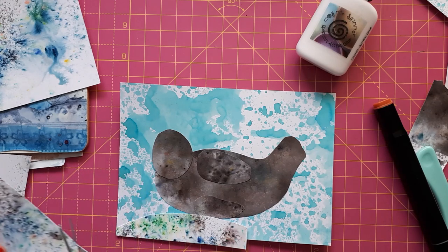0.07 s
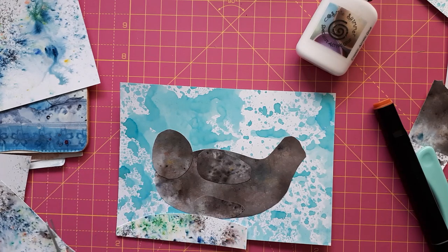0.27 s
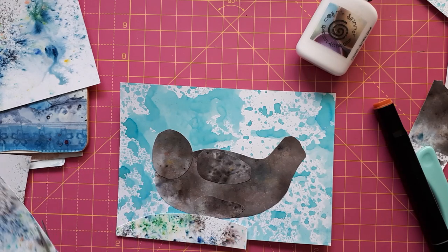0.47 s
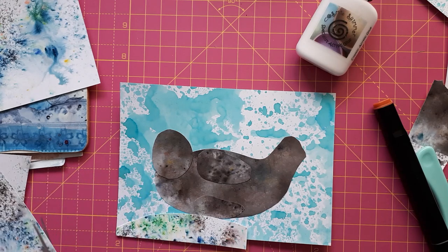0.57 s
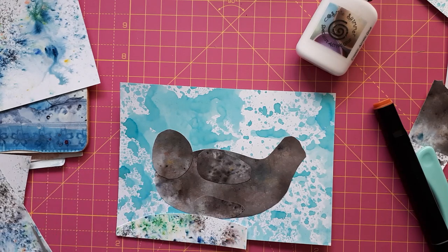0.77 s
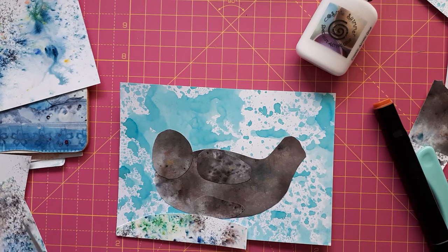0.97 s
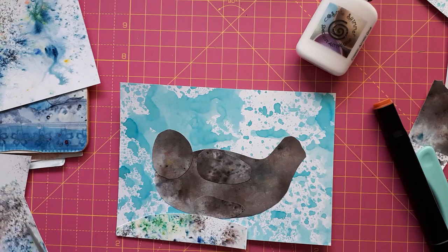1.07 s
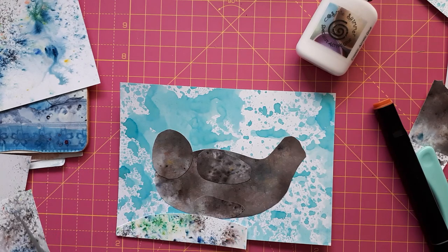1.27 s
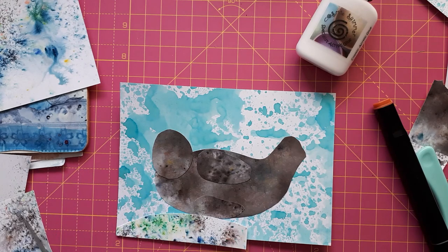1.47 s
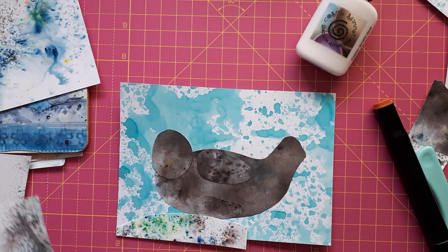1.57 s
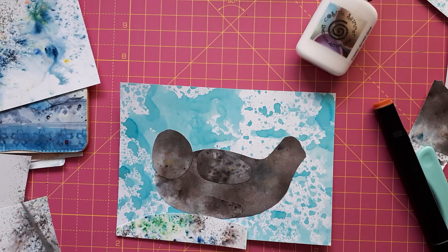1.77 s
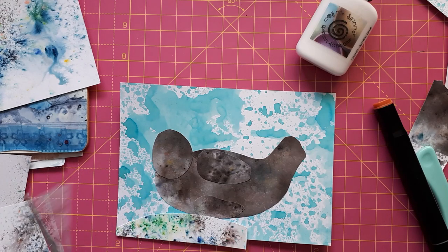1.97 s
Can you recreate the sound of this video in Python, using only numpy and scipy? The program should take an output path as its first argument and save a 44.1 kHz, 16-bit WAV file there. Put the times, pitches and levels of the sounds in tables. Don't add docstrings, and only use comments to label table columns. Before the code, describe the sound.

Close and a little to the right, scissors crunch through stiff paper in five brisk strokes, with thin metal rubbing between them, then the tips click shut, loudest of all, in a small, dry, nearly silent room.

```python
import sys
import numpy as np
from scipy import signal
from scipy.fft import rfft, irfft
from scipy.io import wavfile
from scipy.ndimage import uniform_filter1d, map_coordinates

SR = 44100
rng = np.random.default_rng(int(sys.argv[2]) if len(sys.argv) > 2 else 0)


def put_to_file(sound):
    columns = np.atleast_2d(sound).T
    safe = np.clip(columns, -1, 1)
    whole_steps = np.round(safe * 32767)
    wavfile.write(sys.argv[1], SR, whole_steps.astype(np.int16))


def volts_from_db(level):
    exponent = np.asarray(level, float) / 20
    return 10 ** exponent


N = 89390

# (start [s], end [s], level [dB])
CLOSINGS = [
    (0.225, 0.354, -57),
    (0.642, 0.728, -51),
    (1.007, 1.105, -57.5),
    (1.364, 1.448, -56),
    (1.809, 1.915, -54),
]
# (frequency [Hz], level [dB])
SHEET_COLOUR = [(200, -32), (400, -15), (700, -9), (1100, -3), (1900, -2.5), (3700, -7.5), (4500, -9),
                (7700, -15), (16000, -17.5)]
# (frequency [Hz], level [dB])
RUB_COLOUR = [(400, -24.5), (900, -1), (2100, -1.5), (3900, 2.5), (5000, -23), (7800, -3.5), (9300, -14.5),
              (12000, -4.5), (16000, -19)]


def unit(x):
    return x / np.sqrt(np.mean(x ** 2))


def colour(x, table):
    hz, db = np.array(table).T
    bins_hz = np.linspace(1, SR / 2, 1025)
    log_gain = np.interp(np.log(bins_hz), np.log(np.maximum(hz, 1)), db) * np.log(10) / 20
    cepstrum = irfft(log_gain)
    cepstrum[1:1024] *= 2
    cepstrum[1025:] = 0
    return signal.fftconvolve(x, irfft(np.exp(rfft(cepstrum))))[:len(x)]


def split(x, order, hz):
    return [signal.sosfilt(signal.butter(order, hz, kind, fs=SR, output="sos"), x) for kind in ("low", "high")]


def cut_lows(x, order, hz):
    return signal.sosfilt(signal.butter(order, hz, "high", fs=SR, output="sos"), x)


def ring(x, hz, width):
    return signal.lfilter(*signal.iirpeak(hz, hz / width, fs=SR), x)


def cracks(size, spread_db):
    return rng.standard_normal(size) * volts_from_db(spread_db * rng.exponential(size=size))


def walk(rate):
    k = int(SR / rate)
    return unit(uniform_filter1d(uniform_filter1d(rng.standard_normal(N), k), k))


def burst(length_ms, spread_db, release_ms, attack_ms=0.56):
    sag_ms = 12
    ms = np.arange(3000) / SR * 1000
    swell = 1 - np.exp(-ms / attack_ms)
    decay = np.exp(-np.maximum(ms - length_ms, 0) / release_ms - ms / sag_ms)
    return swell * decay * cracks(len(ms), spread_db)


def add(out, x, s, peak_db):
    i = int(s * SR)
    out[i:i + len(x)] += (x * volts_from_db(peak_db) / np.abs(x).max())[:N - i]


def slips():
    # (time [s], peak [dB], sheet pitch [Hz], treble [dB], length
    # [ms])
    jerks = [(0.144, -57.5, 2200, 11, 2.1), (0.159, -60, 1720, 5.5, 9.4),
             (0.176, -57.5, 940, 10, 1.3), (0.309, -41, 934, -5, 2.5), (0.315, -36, 1070, -5, 1),
             (0.3237, -34, 1310, -4, 0.74), (0.34, -31.5, 1030, -5, 2.8), (0.395, -56, 930, -15, 4.4),
             (0.676, -26, 2320, -3.5, 3.7), (0.734, -22.5, 1790, -28, 1.27),
             (0.772, -46.5, 1250, -3.5, 0.62), (1.07, -32.5, 1680, -23, 1.5),
             (1.119, -49, 876, 5, 0.72), (1.3709, -35.5, 1740, -19, 0.73),
             (1.3776, -28, 1930, -19, 0.28), (1.386, -24, 1980, -5.5, 2),
             (1.441, -23.5, 1840, -1.5, 1.55), (1.796, -56, 1030, 3, 1.4), (1.804, -49, 1020, 4, 1.5),
             (1.812, -40, 1460, -1.5, 3.9), (1.817, -42.5, 990, 3.5, 1.65),
             (1.893, -32, 1004, 6.5, 1.25), (1.909, -46, 2500, 3.5, 2.2), (1.93, -47.5, 3000, 5, 2.7),
             (0.099, -69, 2020, 8, 1.9), (0.244, -74, 864, -26, 2.1), (0.262, -42.5, 805, 3.5, 8.4),
                  (0.3451, -21.5, 1650, -8.5, 3.9), (0.366, -27, 970, -6.5, 1.7),
                  (1.028, -33, 2470, -6, 2.2), (1.054, -24, 982, -7.5, 4.8), (1.089, -21, 2240, -6, 4.1),
                  (1.096, -35, 2360, -27, 2.96), (1.389, -24, 1320, -13, 1.94),
                  (1.4161, -25.5, 1180, -8, 3.1), (1.831, -31, 960, -1, 2.1), (1.867, -29, 947, 0.5, 4),
             (0.123, -62, 910, 9, 6.3), (0.226, -51, 874, 10.5, 6.8), (0.293, -36, 1610, -2, 11),
                 (0.648, -41.5, 1890, -8, 12), (0.665, -31.5, 1590, -3, 10.5),
                 (0.689, -23.5, 2250, -6.5, 6.8), (0.7139, -21, 1830, -9, 4.5),
                 (1.009, -40, 1940, -22, 3.9), (1.015, -26, 1900, -9, 5.7), (1.398, -24, 1340, -11.5, 9.5),
                 (1.844, -28.5, 1560, -4.5, 6.4),
             (1.038, -28.5, 2340, -7, 10.5), (1.016, -29.5, 1195, -33, 8.5),
                   (1.028, -33, 1080, -22, 4), (1.097, -32.5, 800, -20, 3.2), (1.382, -34, 1400, -7, 3),
                   (0.283, -47.5, 930, 7, 3.4), (0.357, -41.5, 1650, -10, 7.2), (0.73, -39, 2600, -11, 8),
                   (3.6, -44, 2900, 2, 10), (1.853, -49, 2000, 4, 7.1), (0.27, -49, 812, 3.5, 1.5),
                   (1.406, -30.5, 1230, -5, 5.3), (1.055, -24, 3800, -18, 2.4),
                   (0.7195, -23.5, 1850, -19, 1.7), (0.716, -27, 1036, -27, 5.4),
                   (0.68, -34.5, 1010, 0.5, 2.5), (0.694, -36, 1050, -23, 6), (1.126, -48, 890, 0, 4.3)]
    # (time [s], frequency [Hz])
    lowest_tone = [(0.2, 636), (0.4, 430), (0.64, 490), (0.78, 390), (1.0, 960), (1.05, 650), (1.12, 547),
                   (1.36, 895), (1.4, 550), (1.79, 730), (1.94, 490)]
    treble_hz, sheet_width = 4240, 0.1
    ring_db, overtone, overtone_db = -1.5, 1.775, -21.5
    edge_hz, edge_width_hz, edge_db = 8340, 490, -12.5
    out = np.zeros(N)
    for s, db, hz, treble_db, ms in jerks:
        ms = max(ms, 0.2)
        x = colour(burst(ms, 2.2, min(2, ms), min(0.56, ms / 4)), SHEET_COLOUR)
        tone = ring(x, hz, sheet_width * hz)
        tone = tone + volts_from_db(overtone_db) * ring(x, overtone * hz, sheet_width * hz)
        body = unit(cut_lows(x, 4, np.interp(s, *np.array(lowest_tone).T)))
        boom, _ = split(body + volts_from_db(ring_db) * unit(tone), 3, treble_hz)
        _, crackle = split(x, 3, treble_hz)
        edge = volts_from_db(edge_db) * unit(ring(x, edge_hz, edge_width_hz))
        add(out, boom, s, db)
        add(out, unit(crackle) + edge, s, db + treble_db)
    return out


def tearing():
    rise_s, fade_s = 0.006, 0.02
    t, gain = np.arange(N) / SR, 0
    for start, end, db in CLOSINGS:
        rise = np.clip((t - start) / rise_s, 0, 1)
        gain = gain + volts_from_db(db) * rise * np.exp(-np.maximum(t - end, 0) / fade_s)
    x = cracks(N, 2.5)
    crackle = unit(volts_from_db(5) * unit(colour(x, SHEET_COLOUR)) + unit(colour(x, RUB_COLOUR)))
    return gain * volts_from_db(3.4 * walk(190)) * crackle


def flaps(x):
    # (frequency [Hz], width [Hz], level [dB])
    flap_tones = [
        (790, 340, 4.5),
        (532, 52, 7),
        (2380, 68, -1),
        (1250, 67, -38),
        (630, 250, -2),
    ]
    t, out = np.arange(N) / SR, x
    for (start, end, _), (hz, width, db) in zip(CLOSINGS, flap_tones):
        during_cut = (t > start - 0.06) & (t < end + 0.06)
        out = out + volts_from_db(db) * ring(x * during_cut, hz, width)
    return out


def steel(x):
    # (frequency [Hz], width [Hz], level [dB])
    blade_tones = [(1030, 330, -2.5), (1340, 370, 1.5), (1710, 83, -8), (2250, 86, 14), (3230, 110, 13.5),
                   (3970, 83, 10.5), (4900, 260, -16), (7200, 2100, -41)]
    return sum((-1) ** k * volts_from_db(db) * ring(x, hz, w) for k, (hz, w, db) in enumerate(blade_tones))


def snaps():
    # (time [s], peak [dB], length [ms])
    tip_clicks = [
        (1.9635, -32, 1.45),
        (1.9969, -15, 4.9),
        (1.9985, -13, 0.28),
        (2.001, -11, 1.02),
        (2.005, -22, 21),
    ]
    # (frequency [Hz], level [dB])
    click_colour = [(100, -35.5), (170, -30), (350, -26), (900, -4.5), (2200, -2), (3300, -9), (5000, -11),
                    (10500, -8.5), (16500, -14.5)]
    thump_hz, thump_width_hz, thump_db = 175, 60.0, -59.5
    out = np.zeros(N)
    for s, db, ms in tip_clicks:
        x = burst(ms, 2.2, release_ms=1)
        add(out, unit(colour(x, click_colour)) + volts_from_db(-2.5) * unit(steel(x)), s, db)
    thump = ring(ring(x, thump_hz, thump_width_hz), thump_hz, thump_width_hz)
    add(out, thump, tip_clicks[1][0], thump_db)
    return out


def opening():
    # (time [s], level [dB])
    pressures = [
        [(0.445, -74), (0.451, -77), (0.461, -62.5), (0.485, -55.5), (0.575, -51), (0.595, -72), (0.615, -71)],
        [(0.83, -89), (0.85, -53.5), (0.926, -52), (0.95, -69), (0.97, -86)],
        [(1.175, -90), (1.195, -54), (1.219, -50.5), (1.245, -44.5), (1.299, -51.5), (1.323, -73), (1.335, -61)],
        [(1.54, -97), (1.554, -57.5), (1.582, -49), (1.656, -49.5), (1.734, -70), (1.738, -91), (1.77, -88)],
    ]
    # (frequency [Hz], width [Hz], level [dB])
    stroke_tones = [
        [(980, 280, -6), (1940, 370, 1), (3050, 270, -10.5), (3520, 410, -5.5), (4770, 250, -6.5)],
        [(1170, 130, -3.5), (2210, 690, 2.5), (3060, 300, -0.5), (3640, 410, -0.5), (5500, 220, -15)],
        [(1375, 56, -11), (1860, 250, 5.5), (2090, 130, 0), (3880, 230, 5), (4500, 170, -18)],
        [(1030, 96, 1), (1290, 170, -10), (2170, 160, -7), (2980, 190, -7.5), (3760, 490, -7.5)],
    ]
    # (tones [dB], hiss [dB], treble at start [dB], its fading [dB/s], glide [1/s], lowest [Hz])
    stroke_mix = [
        (0, -5, 5.5, 42, 0.293, 710),
        (1, -0.5, 6, 60, 0.254, 1170),
        (0, -4.5, 6.5, 96, 0.286, 500),
        (0, -2.5, 5.5, 66, -0.283, 1060),
    ]
    flicker_db, treble_hz = 1.6, 4600
    t, out = np.arange(N) / SR, 0
    low, high = split(unit(colour(cracks(N, 0.65), RUB_COLOUR)), 2, treble_hz)
    for pressure, table, mix in zip(pressures, stroke_tones, stroke_mix):
        tones_db, hiss_db, treble_db, fade, glide, low_hz = mix
        s, db = np.array(pressure).T
        length = s[-1] - s[0]
        since = np.clip(t - s[0], 0, length)
        x = cracks(N, 1.0)
        tones = unit(sum(volts_from_db(d + flicker_db * walk(40)) * unit(ring(x, hz, w)) for hz, w, d in table))
        warped_t = t + glide / 2 * (since - length / 2) ** 2
        tones = map_coordinates(tones, [warped_t * SR], mode="mirror")
        hiss = low + volts_from_db(treble_db - fade * since) * high
        rub = volts_from_db(tones_db) * tones + volts_from_db(hiss_db + 2.3 * walk(86)) * hiss
        rub = cut_lows(rub, 5, low_hz)
        out = out + rub * volts_from_db(np.interp(t, s, db, left=-200, right=-200))
    return out


def knock():
    # (frequency [Hz], level [dB], time to fall 60 dB [s])
    knock_tones = [(590, -61, 0.17), (1675, -73, 0.34), (1830, -70, 0.21), (1918, -59.5, 0.22),
                   (4100, -77, 0.21), (4600, -66, 0.076)]
    t, out = np.arange(N) / SR, 0
    for hz, db, t60 in knock_tones:
        out = out + volts_from_db(db - 60 * t / t60) * unit(ring(rng.standard_normal(N), hz, 27.0))
    return out


def late(x):
    # (frequency [Hz], gain [dB])
    far_gain = [(0, 1.5), (1500, -2), (2800, 1.5), (5500, -0.5), (10000, 2), (22050, 2)]
    # (frequency [Hz], lag [turns])
    far_lag = [(0, 0), (2000, .21), (3000, .28), (4300, .52), (5500, .72), (7500, 1.1), (9300, 1.5),
               (12000, 1.9), (22050, 2.4)]
    sway_samples, sways_per_s = 1.1, 12
    hz = np.linspace(0, SR / 2, N + 1)
    turns = np.interp(hz, *np.array(far_lag).T)
    bend = volts_from_db(np.interp(hz, *np.array(far_gain).T)) * np.exp(-2j * np.pi * turns)
    bent = irfft(rfft(x, 2 * N) * bend)[:N]
    heard_at = np.arange(N) + sway_samples * walk(sways_per_s)
    return map_coordinates(bent, [heard_at], order=5, mode="mirror")


def echoes(x, t60, db, onset_s, hz, kind):
    t = np.arange(SR // 2) / SR
    tails = signal.lfilter(*signal.butter(1, hz, kind, fs=SR), rng.standard_normal((2, len(t))))
    tails = tails * volts_from_db(-60 * t / t60) * np.clip(t / onset_s, 0, 1)
    tails = tails / np.sqrt(np.sum(tails ** 2, axis=1, keepdims=True))
    return volts_from_db(db) * signal.fftconvolve(x[None], tails, axes=1)[:, :N]


def hum():
    # (frequency [Hz], level [dB])
    quiet_colour = [(20, -24), (60, -5.5), (125, -1), (220, -10.5), (700, -10.5), (2000, -17), (5000, -24),
                    (16000, -25)]
    both, left, right = (unit(colour(rng.standard_normal(N), quiet_colour)) for _ in range(3))
    return volts_from_db(-69.5) * (np.array([left, right]) + volts_from_db(0.5) * ring(both, 167.0, 100.0))


def scene():
    far_port_db = -6.5
    hands = flaps(slips() + tearing()) + opening() + snaps() + knock()
    near = np.array([late(hands), hands])
    near = near + echoes(hands, t60=0.07, db=-9, onset_s=0.00011, hz=1740, kind="high")
    room = echoes(hands, t60=0.15, db=-20.5, onset_s=0.024, hz=6300, kind="low")
    return near * volts_from_db([[far_port_db / 2], [-far_port_db / 2]]) + room + hum()


def roll_off(x):
    return signal.sosfilt(signal.butter(12, 17110, fs=SR, output="sos"), x)


def record(dry):
    mix = signal.sosfilt(signal.ellip(8, 0.2, 60, 16400, fs=SR, output="sos"), dry)
    return roll_off(mix)


dry = scene()
out = record(dry)
put_to_file(out)
```